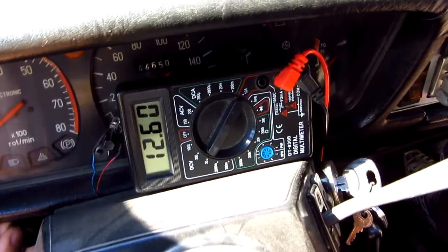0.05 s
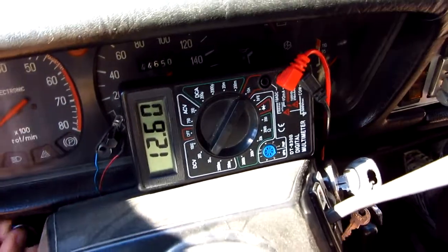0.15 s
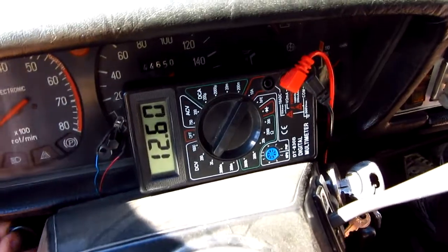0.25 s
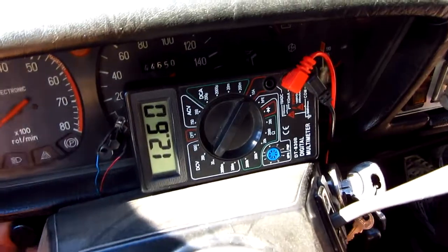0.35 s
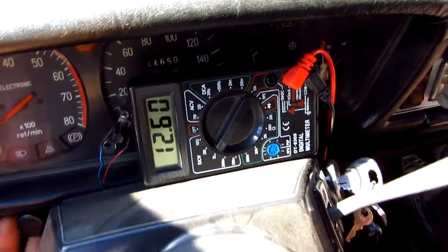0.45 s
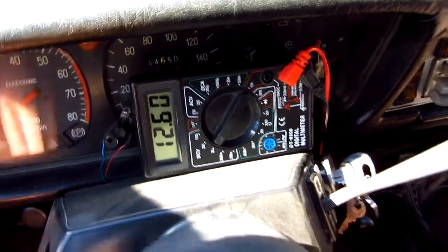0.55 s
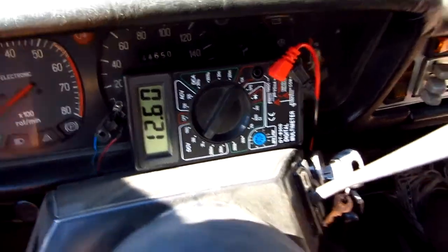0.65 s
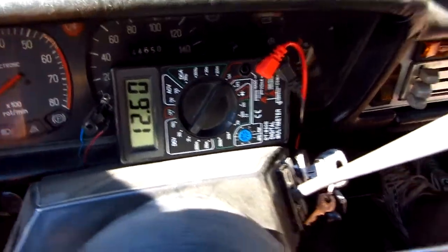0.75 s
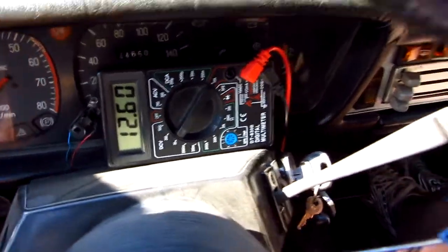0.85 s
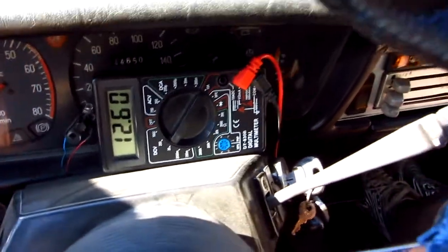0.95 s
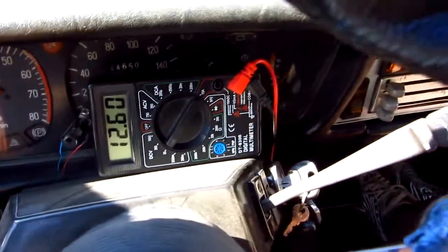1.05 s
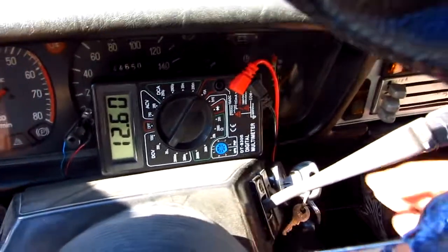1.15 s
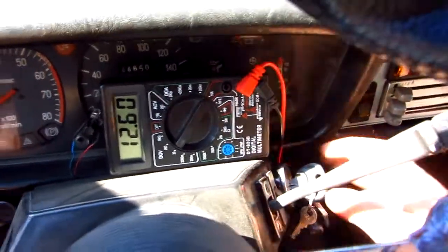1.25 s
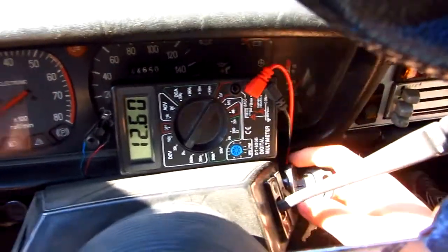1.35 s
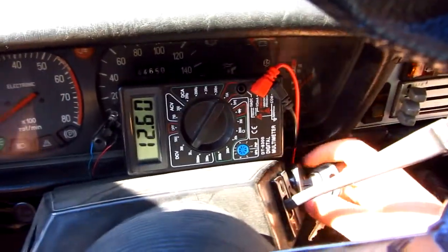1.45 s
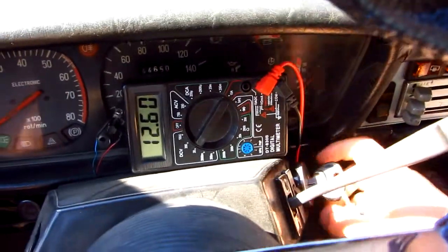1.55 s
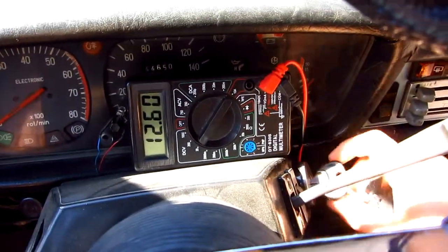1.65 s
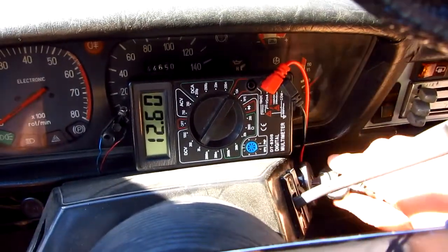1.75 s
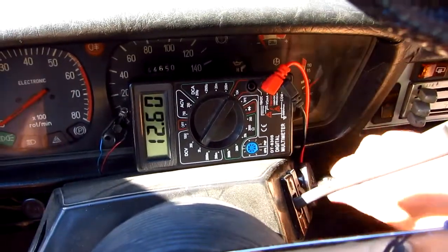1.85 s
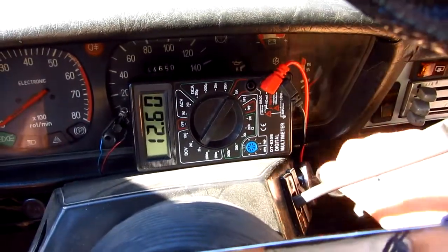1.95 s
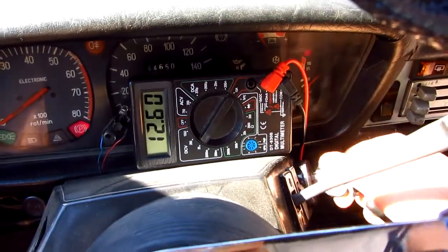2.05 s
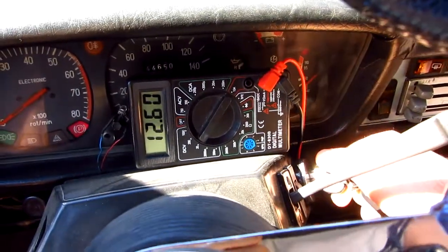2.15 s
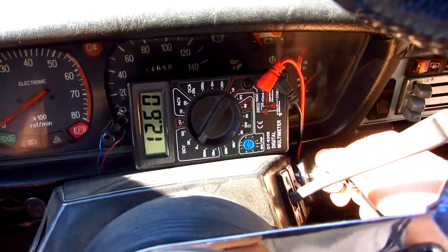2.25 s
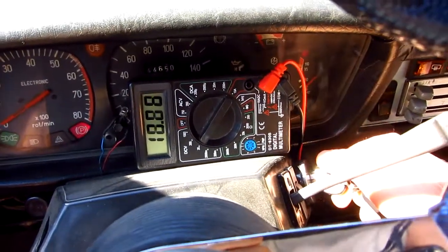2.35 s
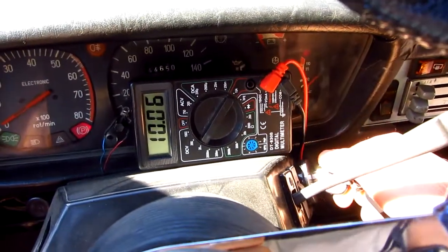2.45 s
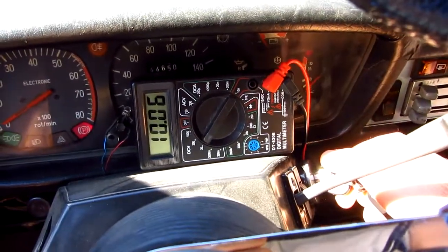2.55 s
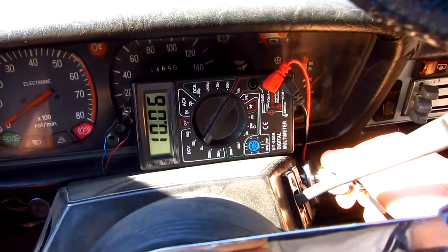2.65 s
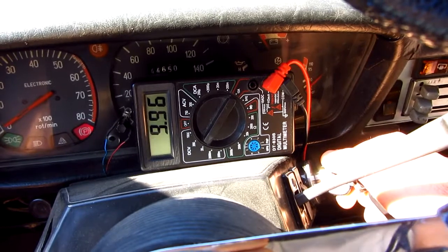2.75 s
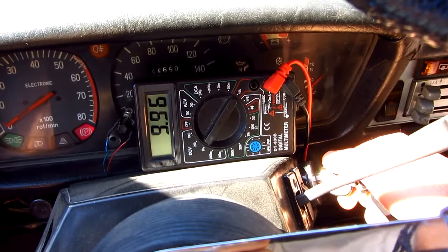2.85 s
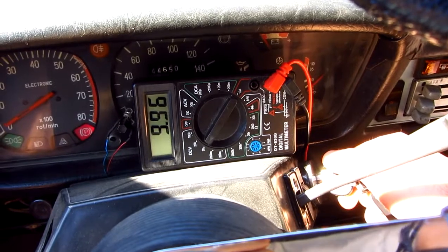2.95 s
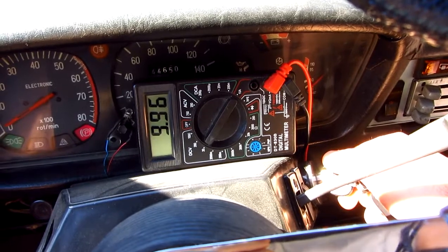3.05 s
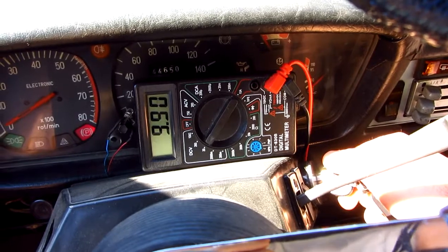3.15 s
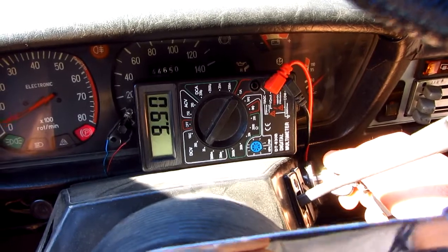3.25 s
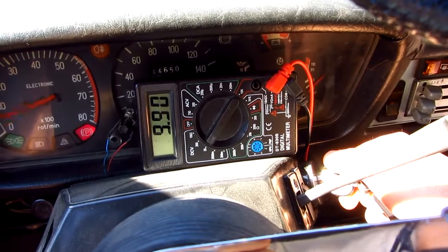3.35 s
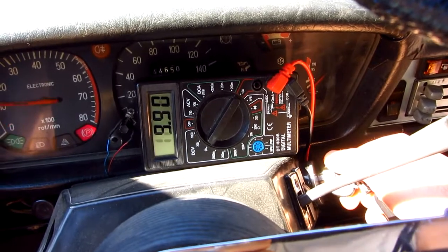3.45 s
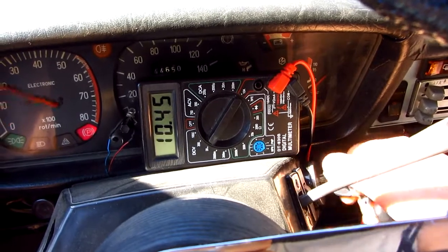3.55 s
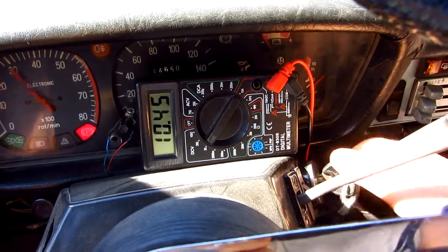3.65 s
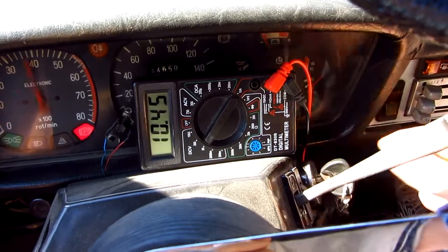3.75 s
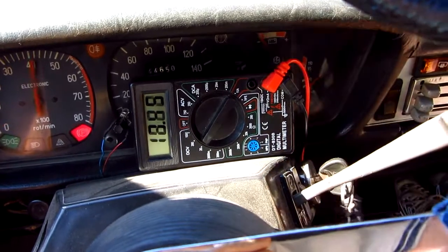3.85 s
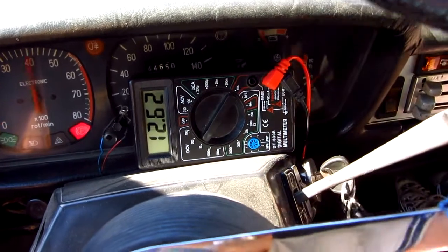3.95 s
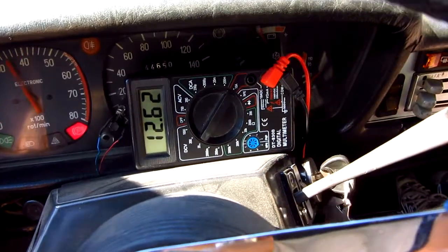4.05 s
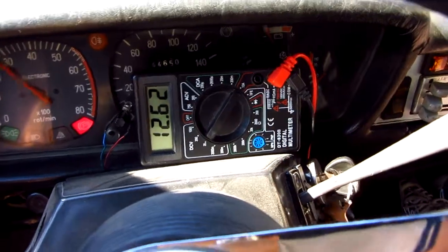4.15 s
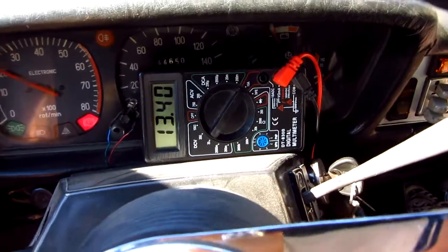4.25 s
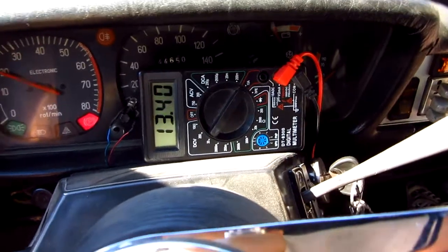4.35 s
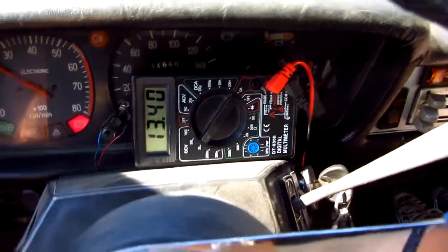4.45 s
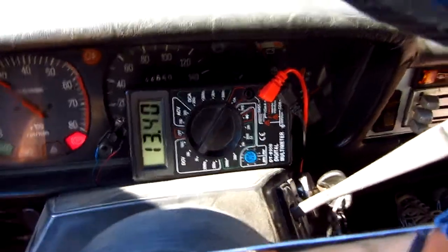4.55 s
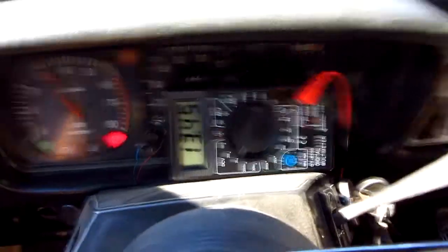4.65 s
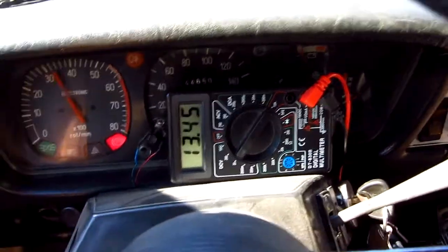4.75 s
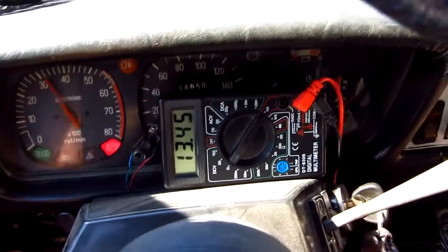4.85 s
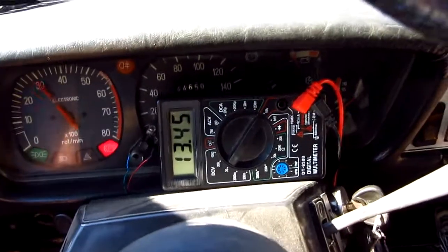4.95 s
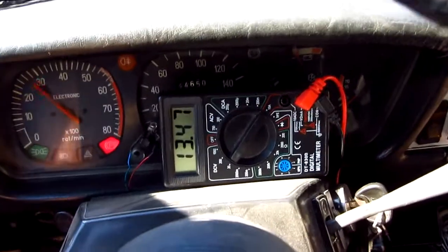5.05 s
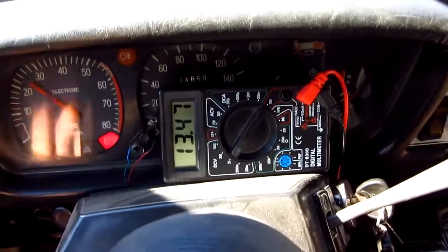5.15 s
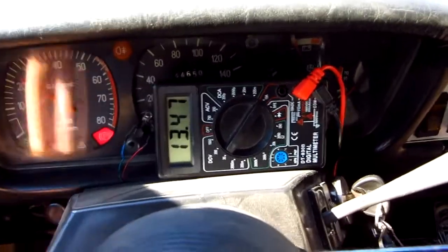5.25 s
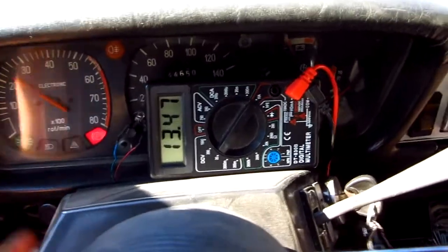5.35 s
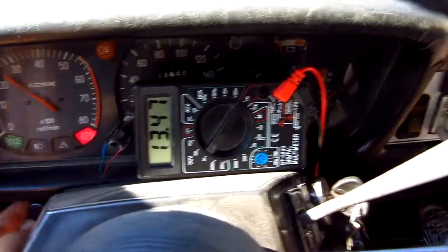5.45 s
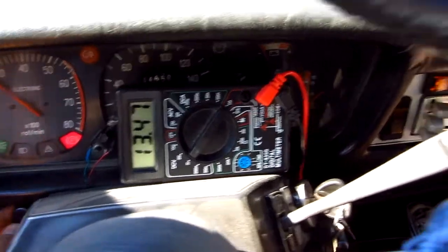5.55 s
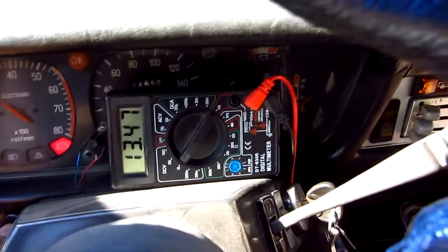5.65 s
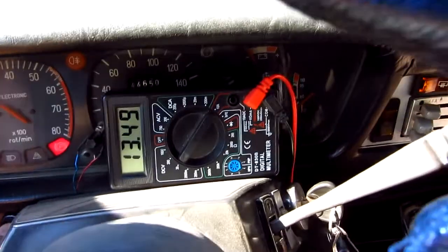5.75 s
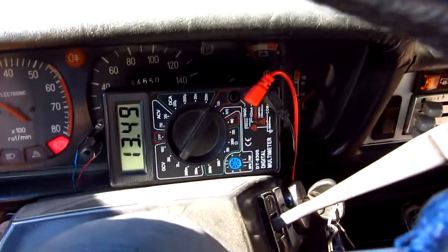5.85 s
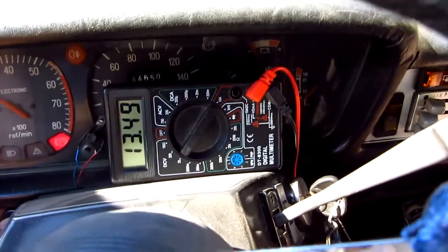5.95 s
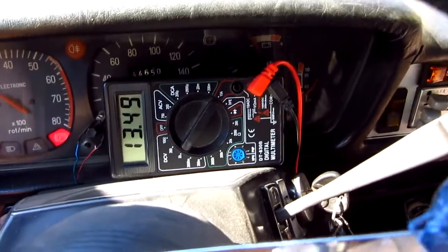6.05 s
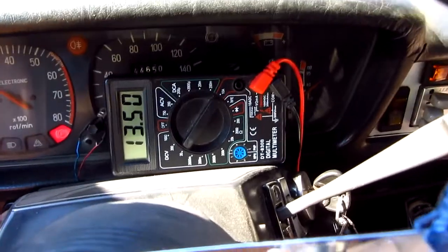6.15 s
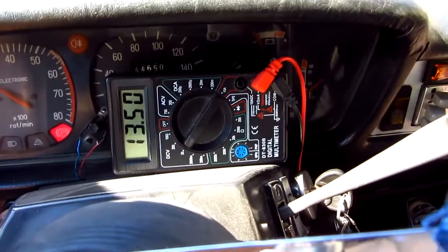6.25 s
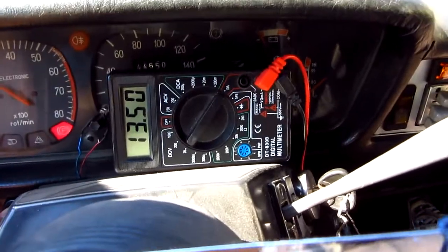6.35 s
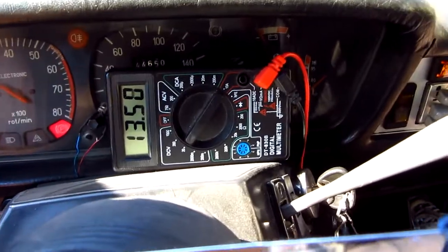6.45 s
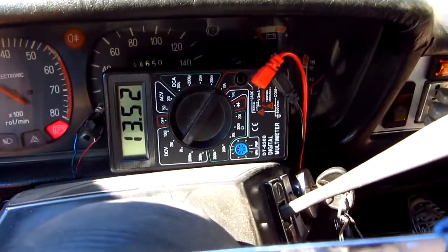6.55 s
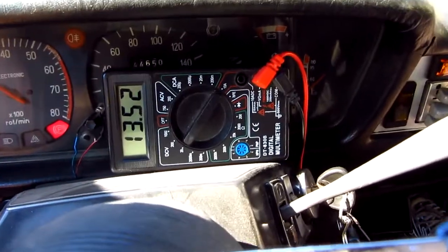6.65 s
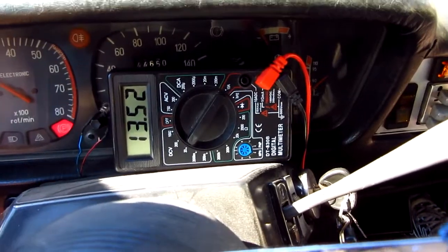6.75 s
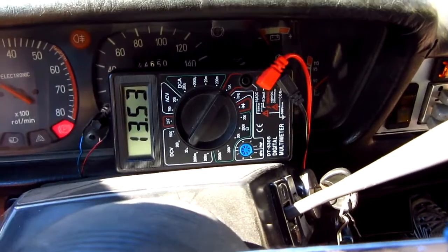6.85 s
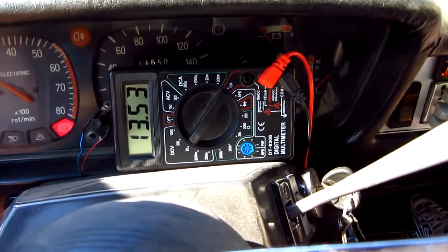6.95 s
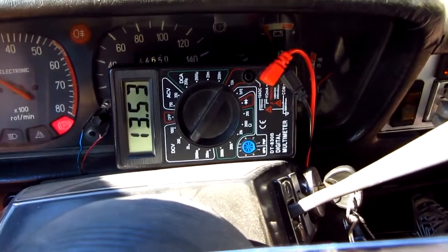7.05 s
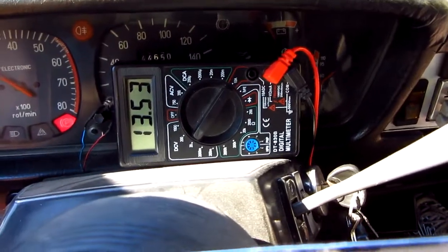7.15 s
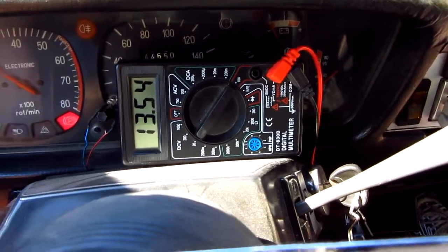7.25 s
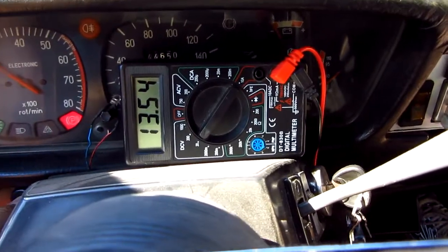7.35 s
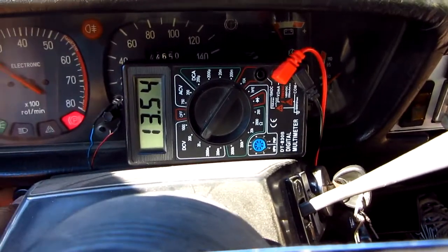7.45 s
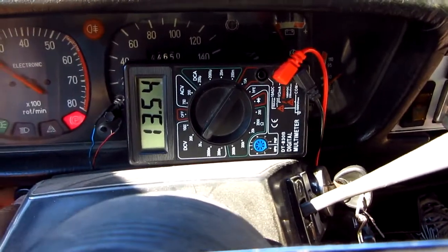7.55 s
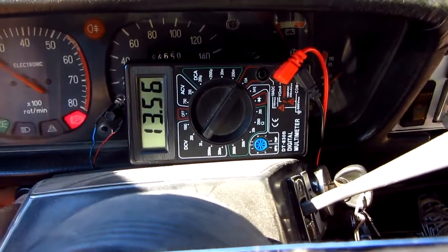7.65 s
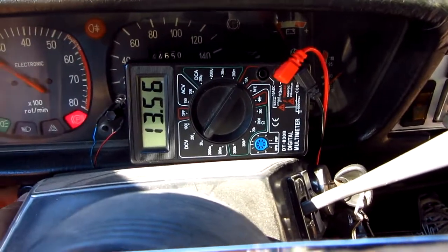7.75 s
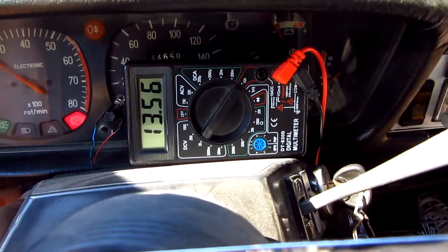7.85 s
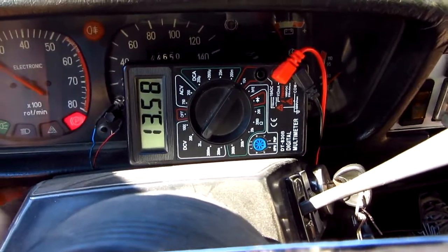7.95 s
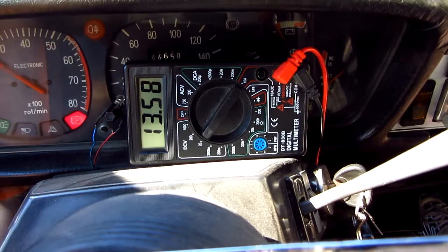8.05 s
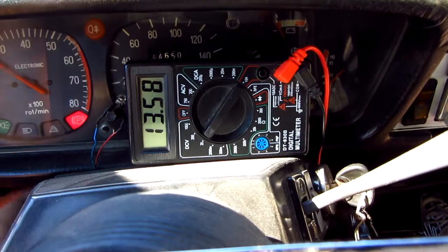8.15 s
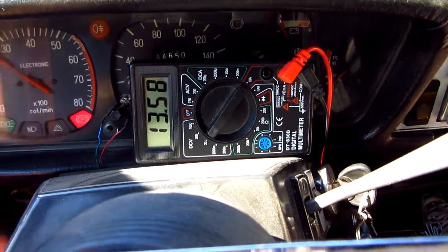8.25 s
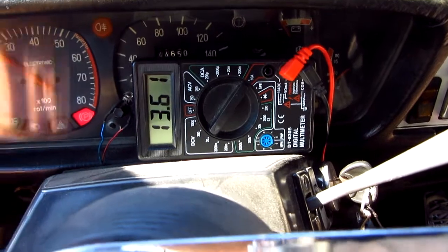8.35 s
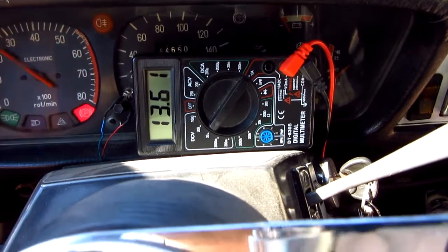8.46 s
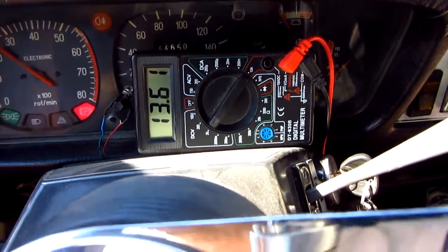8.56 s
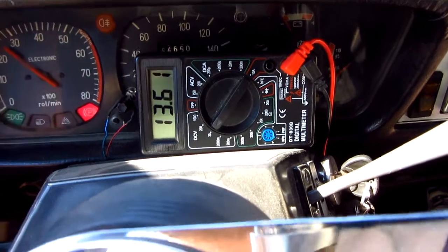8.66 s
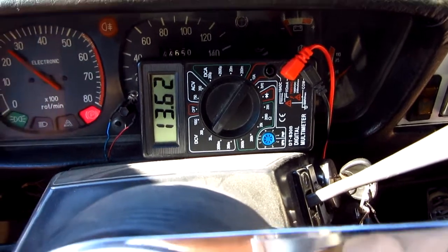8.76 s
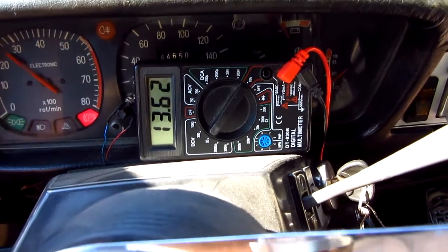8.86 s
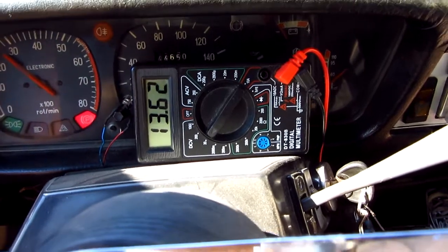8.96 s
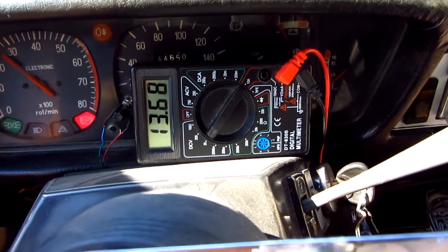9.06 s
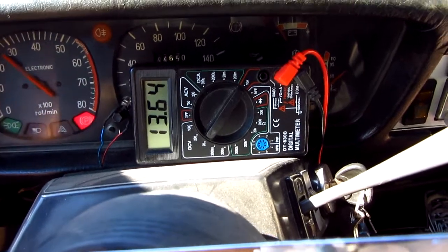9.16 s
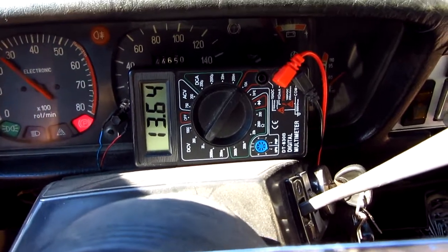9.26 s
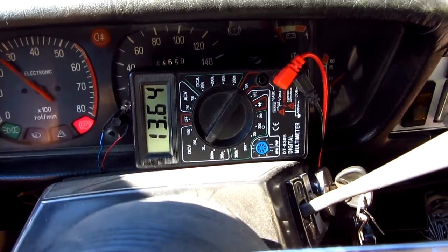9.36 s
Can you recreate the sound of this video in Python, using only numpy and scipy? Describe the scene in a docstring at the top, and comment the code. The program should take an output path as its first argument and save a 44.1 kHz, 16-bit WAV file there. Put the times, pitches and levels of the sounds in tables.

```python
"""Plastic knocks and creaks are heard first inside a parked car, then a sleeve brushes past, keys jingle
and the lock clicks. The starter whines against each compression; a four-cylinder engine catches, revs up
and is held near 2500-2800 rpm, while the trim ticks, squeaks and snaps. Knocks and keys are dying rings,
rubbing is many tiny slips, and the motors are tones that follow their speed, with shaped noise."""
import sys
import numpy as np
from scipy import signal
from scipy.fft import rfft, irfft, next_fast_len
from scipy.io import wavfile
from scipy.ndimage import uniform_filter1d

SR = 44100
rng = np.random.default_rng(int(sys.argv[2]) if len(sys.argv) > 2 else 0)


def master_out(mix):
    """Clip the mix to full scale and print it as 16-bit PCM to the path in sys.argv[1]."""
    frames = np.transpose(np.atleast_2d(mix))
    ceiling = np.clip(frames, -1, 1)
    pcm = np.round(ceiling * 32767).astype(np.int16)
    wavfile.write(sys.argv[1], SR, pcm)


N = 415422
T = np.arange(N) / SR


def amp(db):
    """Turn decibels into a gain."""
    return 10 ** (np.asarray(db) / 20)


def unit(x):
    """Scale to an average (rms) strength of 1."""
    return x / np.sqrt(np.mean(x ** 2) + 1e-18)


def curves(table):
    """Join every column of a timed table by straight lines."""
    s, *columns = np.transpose(table)
    return [np.interp(T, s, column) for column in columns]


def fade(start, end):
    """A ramp from 0 to 1 between two times."""
    return np.clip((T - start) / max(end - start, .001), 0, 1)


def pan(db):
    """Channel gains that make the left this many dB louder than the right."""
    return amp(np.array([[db], [-db]]) / 2)


def walk(rate):
    """A smooth random wander with a spread near 1, given new targets at this rate in Hz."""
    k = int(SR / rate)
    targets = np.repeat(rng.standard_normal(N // k + 1), k)
    return 1.2 * uniform_filter1d(targets, k)[:N]


def colour(x, points, tilt_db=0):
    """Weight the pitches by (frequency [Hz], level [dB]) points and a tilt in dB per octave; rms 1."""
    size = next_fast_len(x.shape[-1])
    octave = np.log2(np.fft.rfftfreq(size, 1 / SR) + 1)
    hz, db = np.transpose(points)
    gain = amp(np.interp(octave, np.log2(hz), db, right=-120) + tilt_db * octave)
    return unit(irfft(rfft(x, size) * gain, size)[..., :x.shape[-1]])


def resonate(x, modes):
    """Let a signal ring (frequency [Hz], width [Hz], level [dB]) resonances; rms 1."""
    size = next_fast_len(x.shape[-1])
    hz = np.fft.rfftfreq(size, 1 / SR)
    gain = 0
    for k, (f, width, db) in enumerate(modes):
        damping = 1j * hz * width
        gain = gain + (-1) ** k * amp(db) * damping / (f * f - hz * hz + damping)
    return unit(irfft(rfft(x, size) * gain, size)[..., :x.shape[-1]])


def air(size):
    """Stereo noise of a small cabin: alike in the bass, less so in the treble."""
    mid, side = rng.standard_normal((2, size))
    side = colour(side, [(150, -8), (900, -4.5), (4000, -1), (SR / 2, 0)])
    return mid + side * np.array([[1], [-1]])


def grains(size, rate, length_s):
    """Outline of random tiny impacts of unequal strength, each dying away; rms 1."""
    hits = (rng.random(size) < rate / SR) * (.5 + rng.exponential(size=size))
    return unit(signal.lfilter([1], [1, -np.exp(-1 / (length_s * SR))], hits))


def burst(points, t60):
    """A sharp coloured crack (60 dB down after t60 seconds) with the cabin's short tail; peak about 1."""
    t = T[:SR // 4]
    decay = amp(-60 * t / t60) + amp(-22 - 60 * t / .15)
    attack = 1 - np.exp(-t / .0007)
    y = colour(air(len(t)), points) * decay * attack
    return y / (3 * np.sqrt(np.mean(y[:, :SR // 200] ** 2)))


def strike(modes, spread):
    """One blow on (frequency [Hz], width [Hz], level [dB]) rings, randomly detuned by spread; peak 1."""
    t = T[:SR // 4]
    ring = 0
    for f, width, db in modes:
        pitch = f * (1 + spread * rng.standard_normal())
        tone = np.sin(2 * np.pi * (pitch * t + rng.random()))
        ring = ring + amp(db) * np.exp(-np.pi * width * t) * tone
    ring = ring * (1 - np.exp(-t / 0.00036))
    return ring / np.abs(ring).max()


def thud(hz):
    """A dull blow that rings for a few cycles; peak about 1."""
    t = T[:SR // 4]
    return np.sin(2 * np.pi * hz * t) * amp(-60 * t * hz / 12) * (1 - np.exp(-t / 0.003))


def add(out, s, sound):
    """Mix a sound in at a time."""
    start = max(int(s * SR), 0)
    out[:, start:start + sound.shape[-1]] += sound[..., :N - start]


# tone of the quiet cabin: (frequency [Hz], relative level [dB])
QUIET_COLOUR = [(25, -10), (80, -1), (230, -4.5), (400, -15.5), (1200, -23.5), (6500, -40), (16000, -61.5)]
QUIET_DB = -40


def quiet_cabin():
    """Soft noise, strongest in the bass, whose level wanders a little."""
    return colour(air(N), QUIET_COLOUR) * amp(QUIET_DB + walk(16))


# rubs: (start [s], length [s], level [dB], slip rate [per s], brightness [dB per octave])
RUBS = [(0, 0.14, -31, 300, -1.2), (0.14, 0.13, -26, 300, -0.6), (0.352, 0.21, -34, 220, -0.7),
        (0.606, 0.3, -42.5, 3600, 2.5), (0.78, 0.13, -41, 6500, 4), (0.878, 0.17, -48.5, 9800, 5.5),
        (1.571, .2, -39, 166, 4), (2.015, 0.071, -32.5, 850, 2)]
# tone of rubbed and rattling parts: (frequency [Hz], relative level [dB])
RUB_COLOUR = [(100, -17), (220, 7.5), (1000, -1.5), (2800, -13.5), (7000, -22.5), (16000, -45.5)]


def rubbing():
    """Cloth, fingers and plastic slip in tiny jerks: sparse slips creak, dense ones hiss."""
    out = np.zeros((2, N))
    for s, length, db, rate, tilt_db in RUBS:
        size = int(length * SR)
        slips = (rng.random(size) < rate / SR) * (.5 + rng.exponential(size=size))
        # each slip dies away, over a steady hiss
        grit = signal.lfilter([1], [1, -np.exp(-1 / (0.0013 * SR))], slips) + .9
        rub = colour(air(size) * grit, RUB_COLOUR, tilt_db) * signal.windows.tukey(size, .4)
        add(out, s, amp(db) * unit(rub))
    return out


# knocks on plastic: (time [s], level [dB], crack against the whole knock [dB])
KNOCKS = [(0.08, -7.5, -5.5), (0.102, -10, -9), (0.135, -7, -15), (0.185, -15, -13), (0.206, -13, -14),
          (0.23, -10, -15), (0.312, -23.5, -17), (0.348, -16.5, -11), (0.398, -14, -6.5),
          (0.41, -15.5, -13), (0.457, -12, -12), (0.522, -7.5, -15), (0.595, -25.5, -17), (0.711, -4.5, -8),
          (0.727, -11, -18), (0.758, -12, -35), (1.415, -18, -14), (3.905, -16.5, -13), (3.298, -3, -15)]
# rings of the hollow plastic: (frequency [Hz], width [Hz], level [dB])
PLASTIC_RINGS = [(204.5, 10.7, -7.5), (344.4, 11.3, -10), (573, 51, 0.5), (739, 30, -1.5), (1010, 99, 1),
                 (1353, 72, -9), (2073, 49, -9), (2770, 250, -3.5)]


def knocks():
    """Each blow rings the hollow plastic, with a dull rattle and a sharp crack."""
    out = np.zeros((2, N))
    for s, db, crack_db in KNOCKS:
        crack = burst([(1500, -19), (2800, 14.0), (4000, -2.5), (16000, -24.0)], 0.017)
        body = 0.58 * strike(PLASTIC_RINGS, spread=0.054) + 0.38 * burst(RUB_COLOUR, 0.091)
        add(out, s, amp(db) * (body + amp(crack_db) * crack))
    return out


# dull blows through the body: (time [s], level [dB], pitch [Hz])
THUDS = [(0.761, -17, 43.6), (1.665, -25.5, 200), (2.222, -6, 239)]


def thuds():
    """Heavy blows shake the car body for a few low cycles."""
    out = np.zeros((2, N))
    for s, db, hz in THUDS:
        add(out, s, amp(db) * thud(hz))
    return out


# rings of the key ring: (frequency [Hz], width [Hz], level [dB])
KEY_RING = [(1290, 76, 1), (2080, 63, 3), (3360, 90, -3), (4380, 70, -6), (7050, 79, -15)]
# bright tone of small steel parts: (frequency [Hz], relative level [dB])
STEEL_COLOUR = [(2000, -3.5), (4200, -2), (6500, 2), (8300, -1.5), (10000, -7), (16000, -20.5)]


def key_clack():
    """Damped keys strike their ring: a short metallic clack with a dry tick."""
    ring = np.array([strike(KEY_RING, spread=0.015) for _ in range(2)])
    return ring + 0.68 * burst(STEEL_COLOUR, 0.031)


# rings shared by the bunch: (frequency [Hz], level [dB], time to fall 60 dB [s])
KEY_MODES = [(10300, -2, 0.16), (14820, -1, 0.21)]
KEY_RANGE_HZ, KEY_T60_S = (3500, 15500), .07  # each key's own rings


def key_touch():
    """One key taps another: a bright tick and thin rings, some shared by the bunch and some its own."""
    t = T[:SR // 4]
    shared = [(f * (1 + 0.02 * rng.standard_normal()), d, t60) for f, d, t60 in KEY_MODES]
    own = [(f, 0, KEY_T60_S) for f in rng.uniform(*KEY_RANGE_HZ, size=7)]
    ring = 0
    for f, db, t60 in shared + own:
        side_gains = rng.standard_normal((2, 1))
        ring = ring + amp(db - 60 * t / t60) * side_gains * np.sin(2 * np.pi * f * t)
    return .1 * ring + .5 * burst(STEEL_COLOUR, .02)


# keys held in the hand clack without ringing on: (time [s], level [dB])
CLACKS = [(1.627, -23.5), (1.65, -19), (1.78, -34), (1.536, -36), (1.809, -28.5)]
# jolts of the hanging bunch: (time [s], level [dB])
KEY_JOLTS = [(1.604, -25), (1.709, -21), (3.64, -20), (3.729, -28), (4.16, -35)]
SWING_S, SWING_LOSS_DB = 0.12, 12.5  # basic swing time, and loss at each further touch
JINGLE_SPAN_S, JINGLE_DB, JINGLE_CLACK_DB = (1.625, 1.74), -27, -35


def keys():
    """Keys clack in the hand, jingle as it takes hold, and swing back to touch ever more weakly."""
    out = np.zeros((2, N))
    for s, db in CLACKS:
        add(out, s, amp(db) * key_clack())
    for s, db in KEY_JOLTS:
        for swing in range(3):
            lag = swing * SWING_S * rng.uniform(0.6, 1.6)
            add(out, s + lag, amp(db - swing * SWING_LOSS_DB) * key_touch())
    for s in rng.uniform(*JINGLE_SPAN_S, size=13):
        strength = amp(2.9 * rng.standard_normal())
        jingle = amp(JINGLE_DB) * key_touch() + amp(JINGLE_CLACK_DB) * key_clack()
        add(out, s, strength * jingle)
    return out


# clicks of the ignition lock: (time [s], level [dB], treble balance before a 6 dB lift [dB])
LOCK_CLICKS = [(1.91, -16.5, -12), (1.943, -11, -2.5), (2.05, -11.5, -12), (2.102, -16.5, 8),
               (2.158, -19, -6.5), (3.727, -5, -9), (3.782, -11, -8)]
# tone of the lock's body: (frequency [Hz], relative level [dB])
LOCK_BODY = [(200, -30), (550, 13), (900, 0.5), (1700, -3.5), (2500, -0.5), (5000, -28)]


def ignition_lock():
    """The lock snaps over its detents: the ball lets go, then lands a few ms later."""
    out = np.zeros((2, N))
    for s, db, treble_db in LOCK_CLICKS:
        for lag, share in [(0, 0.65), (.004, 0.32)]:
            click = burst(LOCK_BODY, 0.11) + amp(treble_db + 6) * burst(STEEL_COLOUR, 0.047)
            add(out, s + lag, share * amp(db) * click)
    return out


SOLENOID_S, SOLENOID_HZ, SOLENOID_FALL_HZ_PER_S, SOLENOID_DB = 2.159, 2280, 9000, -27.5


def solenoid():
    """The starter's pinion is thrown forward: a rough, falling chirp, loudest at its start."""
    t = np.clip(T - SOLENOID_S, 0, .1)
    hz = (SOLENOID_HZ - SOLENOID_FALL_HZ_PER_S * t) * (1 + 0.2 * walk(1500))
    envelope = (.4 + np.exp(-t / .008)) * (T > SOLENOID_S) * (1 - (t / .1) ** 2)
    return amp(SOLENOID_DB) * envelope * np.sin(2 * np.pi * np.cumsum(hz) / SR)


# moments when a piston passes the top: (time [s])
COMPRESSIONS = [2.365, 2.505, 2.618, 2.742, 2.822, 2.955, 3.075, 3.2]
# starter whine before it sags: (time [s], pitch [Hz])
WHINE = [(2.21, 255), (2.29, 318), (2.35, 334.5), (2.4, 429.6), (2.47, 439.4), (2.52, 550)]
# tone of the grinding teeth: (frequency [Hz], relative level [dB])
STARTER_BODY = [(30, -8.5), (140, -2), (400, -12), (950, -22.5), (1200, -34.5), (6000, -51.5), (12000, -81)]
# rings of starter and ring gear: (frequency [Hz], width [Hz], level [dB])
GEAR_RINGS = [(730, 115, 2), (1524, 200, -5), (2700, 62, -17)]
GEAR_DB = -14.5
STARTER_S, STARTER_DB = 2.195, -27
INRUSH_DB, INRUSH_S = 16, 0.11  # the motor is loudest from standstill
WHINE_SAG, SAG_FROM, CHUG_DB = .5, .37, 4.5  # share of pitch lost, part of the stroke where it starts
HOUSING_HZ, HOUSING_WIDTH_HZ, HOUSING_DB = 315, 21, 12  # the whine swells near the housing's ring


def starter():
    """The motor slows and groans as each piston comes up, then runs free over the top."""
    stroke = np.interp(T, COMPRESSIONS, np.arange(len(COMPRESSIONS))) % 1
    cranking = fade(COMPRESSIONS[0] - .04, COMPRESSIONS[0])
    # the whine holds, sags late in each compression and springs back once the piston is over
    late = np.maximum(stroke - SAG_FROM, 0) / (1 - SAG_FROM)
    whine_hz = curves(WHINE)[0] * (1 - WHINE_SAG * late)
    smooth_hz = uniform_filter1d(whine_hz, SR // 80)
    mesh = 2 * np.pi * np.cumsum(smooth_hz * (1 + .02 * walk(200))) / SR
    # greatest midway between two tops
    strain = -np.cos(2 * np.pi * stroke) * cranking
    whine = 0
    for multiple, db in [(1, 0), (1.6, -15), (2, -19)]:
        whine = whine + amp(db) * (1 + .3 * walk(130)) * np.sin(multiple * mesh)
    hum_phase = 2 * np.pi * np.cumsum(160 * (1 + 0.101 * walk(90))) / SR
    hum = amp(-3 + 2 * walk(28.03)) * np.sin(hum_phase)
    # the teeth grind once per turn of the armature: every fourth cycle of the whine
    teeth = air(N) * (1 + 0.32 * np.cos(mesh / 4))
    grind = amp(-3.0) * colour(teeth, STARTER_BODY)
    clash = amp(GEAR_DB) * resonate(teeth * grains(N, rate=2000, length_s=.003), GEAR_RINGS)
    housing_db = HOUSING_DB / (1 + ((whine_hz - HOUSING_HZ) / HOUSING_WIDTH_HZ) ** 2)
    motor = whine * amp(2 * strain - 6.0 + housing_db) + hum + grind + clash
    inrush_db = INRUSH_DB * (1 - fade(STARTER_S, STARTER_S + INRUSH_S))
    level = amp(STARTER_DB + inrush_db + CHUG_DB * strain)
    return motor * level * fade(STARTER_S, STARTER_S + 0.019) * (1 - fade(3.2, 3.38))


# engine speed once it runs: (time [s], firing rate [Hz])
SPEED = [(3.76, 110.2), (3.87, 108), (4.04, 99), (4.27, 97.4), (4.42, 99.34), (4.81, 100.3), (5.12, 91.52),
         (6.15, 84.14), (6.8, 82.27), (7.45, 83.93), (8.0, 82.5), (8.9, 91.1), (9.42, 92.8)]
CATCH_S, CATCH_HZ, RUN_UP_POWER = 3.16, 24.04, 1.35  # first firing; the speed then climbs ever faster


def firing_rate():
    """The engine runs up from its first firing, then follows the pedal."""
    flare_s, flare_hz = SPEED[0]
    run_up = CATCH_HZ + (flare_hz - CATCH_HZ) * fade(CATCH_S, flare_s) ** RUN_UP_POWER
    return np.where(T < flare_s, run_up, curves(SPEED)[0])


# bouts of hard combustion, the catch and the flare: (start [s], hold [s], boost [dB])
SURGES = [(3.202, 0.11, 7), (3.606, 0.029, 5.5)]
SURGE_ATTACK_S, SURGE_RELEASE_S = 0.035, 0.085


def surge_db():
    """Each bout of hard combustion swells, holds and dies away."""
    total = 0
    for s, hold, db in SURGES:
        after_hold = np.maximum(T - s - SURGE_ATTACK_S - hold, 0)
        total = total + db * fade(s, s + SURGE_ATTACK_S) * np.exp(-after_hold / SURGE_RELEASE_S)
    return total


# kicks on the mounts: (time [s], thump level before a 2 dB lift [dB], thump pitch [Hz], rattle level [dB])
KICKS = [(3.187, -15, 139.7, -25), (3.236, -3, 135, -20), (3.272, -10, 171, -15.5), (3.302, -7, 172, -13),
         (3.334, -6.5, 177, -19), (3.349, -7.5, 119, -11), (3.387, -4, 85, -13.5)]
# rings of the engine on its mounts: (frequency [Hz], width [Hz], level [dB])
MOUNTS = [(62, 25.6, -2), (124, 50, 0.5), (200, 55, 0)]
# the rubber passes no treble: (frequency [Hz], relative level [dB])
SHOVE_COLOUR = [(400, 0), (2500, -50)]
RUN_UP_RATTLE_DB, SHAKE_DB = -35, -22


def catch():
    """The first firings kick the engine on its mounts; loose parts rattle until it is up to speed."""
    firings = np.cumsum(firing_rate()) / SR
    racing = fade(CATCH_S, CATCH_S + 0.081) * (1 - fade(3.69, 3.78))
    jolt = 0.35 + np.exp(-(firings % 1) / 0.51)
    loose_parts = air(N) * jolt * grains(N, rate=900, length_s=0.0039)
    rattle = colour(loose_parts, RUB_COLOUR) * amp(RUN_UP_RATTLE_DB)
    # every firing is a shove of its own strength
    shoves = np.diff(np.floor(firings), prepend=0) * amp(3 * rng.standard_normal(N))
    shaking = amp(SHAKE_DB + surge_db() / 2) * colour(resonate(shoves, MOUNTS), SHOVE_COLOUR)
    out = (rattle + pan(-3) * shaking) * racing
    for s, thump_db, hz, rattle_db in KICKS:
        thump = amp(thump_db + 2) * pan(-2) * thud(hz)
        add(out, s, thump + amp(rattle_db) * burst(RUB_COLOUR, 0.16))
    return out


# resonances of the cabin: (frequency [Hz], width [Hz], level [dB])
BOOMS = [(87.2, 17.4, -13.5), (109.9, 5, -18.5), (166.5, 13.3, -23), (197.8, 35.3, -28.5),
         (292.3, 41.3, -23), (390, 34.3, -34), (588, 36, -36)]
BETWEEN_BOOMS_DB = -45.5


def boom(hz):
    """Gain of the cabin, which swells a tone as it sweeps through a resonance."""
    gain = amp(BETWEEN_BOOMS_DB)
    for f, width, db in BOOMS:
        gain = gain + amp(db) / (1 + np.square((2 * (hz - f) / width) ** 2))
    return gain


def reflections(x):
    """Glass and trim send back tens of ms of echoes, which comb the spectrum with narrow peaks."""
    t = T[:SR // 16]
    echoes = air(len(t)) * amp(-60 * t / 0.13)
    # hard surfaces nearby reflect the treble best
    echoes = colour(echoes, [(1000, -8), (4000, 0), (SR / 2, 0)])
    return unit(signal.fftconvolve(x, echoes, axes=1)[:, :N]) + .55 * unit(x)


# how hard the engine works: (time [s], effort [dB])
EFFORT = [(4.15, -4), (4.8, -1.5), (5.9, -1.35), (7.1, -3), (8.3, -1.5)]
# weaker lines from unequal cylinders: (multiple of firing rate [-], level before the weak-line gain [dB])
WEAK_LINES = [(1.75, -36.5), (2.25, -38), (2.5, -34), (2.75, -34), (3.5, -39), (6.25, -39), (8.5, -42),
              (9, -43), (11.33, -43)]
# tone of the block's rumble: (frequency [Hz], relative level [dB])
RUMBLE_COLOUR = [(25, -22), (50, -5.5), (90, -3), (170, 2), (280, -3), (420, -7), (700, -11.5), (1000, -27),
                 (1600, -40.5)]
# tone of the valve clatter: (frequency [Hz], relative level [dB])
CLATTER_COLOUR = [(450, -26), (620, -3), (950, -1), (1150, -9.5), (1400, -10), (1800, -18.5), (2700, -21.5),
                  (3500, -37.5), (7000, -31.5), (12000, -58)]
# rings of the cylinder head and its covers: (frequency [Hz], width [Hz], level [dB])
HEAD_RINGS = [(2170, 180, -3), (4670, 150, -7), (6180, 55, -5.5), (6500, 140, -3.5), (7370, 130, -5.5)]
RUMBLE_DB, CLATTER_DB, HEAD_DB = -22.5, -31.5, -56.5  # before effort and surges
SETTLE_S = (4.98, 5.1)  # ragged running smooths out
BUZZ_HZ, BUZZ_WIDTH_HZ, BUZZ_DB = 85.16, 2.1, 5  # firing rate at which the body passes weak lines best
SURGE_CLATTER_SHARE = 0.83  # a surge lifts the clatter less than the rumble
COUGH_DB, SMOOTH_S = 2.5, 3.9  # uneven combustion shakes the level, less and less until SMOOTH_S
LIFT_S, LIFT_LENGTH_S, LIFT_DB = 3.74, 0.24, -3.5  # the throttle shuts and the rumble dips


def engine():
    """Four unequal cylinders: firing harmonics boom in the cabin, over block rumble and valve clatter."""
    hz, surge = firing_rate(), surge_db()
    effort_db = curves(EFFORT)[0] + COUGH_DB * walk(35) * (1 - fade(CATCH_S, SMOOTH_S))
    firings = np.cumsum(hz * (1 + .0035 * walk(25))) / SR
    settled = fade(*SETTLE_S)

    def line(order, db, waver_db):
        """A tone at a multiple of the firing rate, wavering in level."""
        level = np.sqrt(2) * amp(db + waver_db * walk(14))
        return level * np.sin(2 * np.pi * (order * firings + rng.random()))

    def panel_db(line_hz):
        """Swell of a line as it sweeps through the resonance of a body panel."""
        return 7 / (1 + ((line_hz - 735) / 14) ** 2)

    # the boom is stronger on the right; it has no time to build during the run-up
    lines = pan(-6.0) * boom(hz) * line(1, -12 * (1 - fade(3.7, 3.75)), 0.58)
    lines = lines + pan(-1.4) * boom(2 * hz) * line(2, surge - .7, 1.1)
    for order in (3, 4, 5, 6):
        lines = lines + boom(order * hz) * line(order, 0.38 * surge, 1.2)
    # a growl near the crankshaft's own turn drops back when the engine settles
    lines = lines + pan(-7) * line(0.56, -39 - 10 * settled, 0.54)
    buzz_db = BUZZ_DB / (1 + ((hz - BUZZ_HZ) / BUZZ_WIDTH_HZ) ** 2)
    weak_db = -6 * (1 - settled) - 2.5 + buzz_db
    for order, db in WEAK_LINES:
        side = pan(rng.standard_normal() - 1)
        lines = lines + side * line(order, db + weak_db + panel_db(order * hz), 1.4)
    # each firing throws a puff of noise, deeper until the engine settles
    stroke = np.cos(2 * np.pi * firings)
    puffs = air(N) * (1 + (1 - settled / 2) * fade(3.18, 3.6) * stroke)
    lift_db = LIFT_DB * np.sin(np.pi * fade(LIFT_S, LIFT_S + LIFT_LENGTH_S))
    rumble_db = RUMBLE_DB + lift_db + surge + effort_db + 1.1 * walk(18)
    rumble = colour(puffs, RUMBLE_COLOUR) * amp(rumble_db)
    # valve gear repeats one pattern of taps on each turn of the camshaft (four firings)
    pattern = rng.standard_normal(1024)
    taps = pattern[(firings / 4 % 1 * len(pattern)).astype(int)]
    valves = (air(N) + .6 * taps) * (1 + .4 * stroke)
    clatter = amp(CLATTER_DB) * colour(reflections(valves), CLATTER_COLOUR)
    clatter = clatter + amp(HEAD_DB) * resonate(valves, HEAD_RINGS)
    clatter = clatter * amp(effort_db + SURGE_CLATTER_SHARE * surge + 0.7 * walk(16))
    noise = pan(-0.25) * (rumble + clatter) * fade(CATCH_S, CATCH_S + 0.019)
    return lines * fade(3.4, 3.62) + noise


# short runs of dry ticks: (start [s], end [s], gap between ticks [s])
TICK_RUNS = [(5.807, 5.895, .035), (7.737, 7.82, .0235)]
# tone of a tick: (frequency [Hz], relative level [dB])
TICK_COLOUR = [(2000, -13), (3400, -2.5), (5400, 2), (16000, -31.5)]
TICK_DB = -25.5


def trim_ticks():
    """The trim chatters in evenly spaced dry ticks, a little to the left."""
    out = np.zeros((2, N))
    for start, end, gap in TICK_RUNS:
        for s in np.arange(start, end, gap):
            add(out, s, amp(TICK_DB) * pan(2.7) * burst(TICK_COLOUR, 0.012))
    return out


SQUEAK_S, SQUEAK_LENGTH_S, SQUEAK_DB = 7.848, 0.068, -20  # level before the channel gains
SQUEAK_HZ, SQUEAK_DROP_HZ, SQUEAK_GLIDE_S = 8490, 260, .02  # final pitch, extra at the start, glide


def squeak():
    """A thin squeak starts quickly, drops in pitch and dies away."""
    hz = SQUEAK_HZ + SQUEAK_DROP_HZ * np.exp(-np.maximum(T - SQUEAK_S, 0) / SQUEAK_GLIDE_S)
    phase = 2 * np.pi * np.cumsum(hz * (1 + 0.0042 * walk(500))) / SR
    envelope = fade(SQUEAK_S, SQUEAK_S + 0.0087) * (1 - fade(SQUEAK_S, SQUEAK_S + SQUEAK_LENGTH_S))
    tone = np.sqrt(2) * amp(SQUEAK_DB) * envelope * np.sin(phase)
    # louder on the left, with the right in opposite phase
    return np.array([[2], [-.6]]) * tone


# rings of the snapping panel: (frequency [Hz], width [Hz], level [dB])
SNAP_RINGS = [(1015, 81, 2), (1750, 120, -5), (2190, 97, -3)]
SNAP_S, SNAP_DB = 8.034, -9.5


def panel_snap():
    """A panel snaps once: a short ring with a bright crack."""
    out = np.zeros((2, N))
    snap = strike(SNAP_RINGS, spread=0) + 0.14 * burst(STEEL_COLOUR, 0.023)
    add(out, SNAP_S, amp(SNAP_DB) * snap)
    return out


def scene():
    """Everything in the cabin, over its quiet background."""
    before = quiet_cabin() + rubbing() + knocks() + thuds() + keys() + ignition_lock()
    starting = solenoid() + starter() + catch()
    return before + starting + engine() + trim_ticks() + squeak() + panel_snap()


TOP_HZ = 16000


def record(dry):
    """Clip the peaks at full scale, then cut the treble steeply above TOP_HZ."""
    low_pass = signal.ellip(8, .2, 80, TOP_HZ, fs=SR, output="sos")
    return signal.sosfilt(low_pass, np.clip(dry, -1, 1))


dry = scene()
out = record(dry)
master_out(out)
```